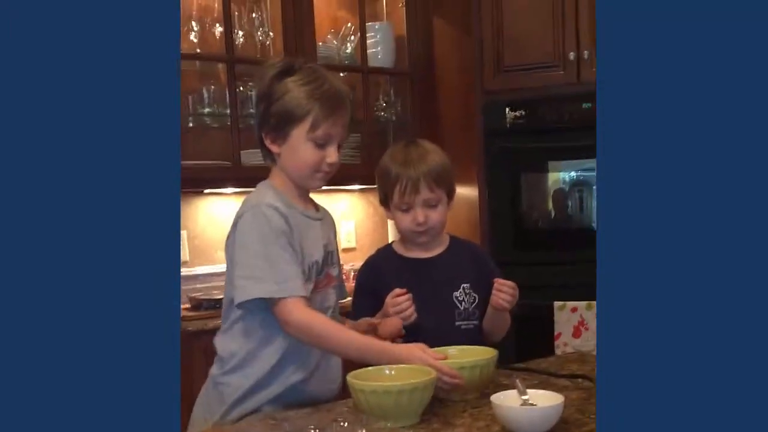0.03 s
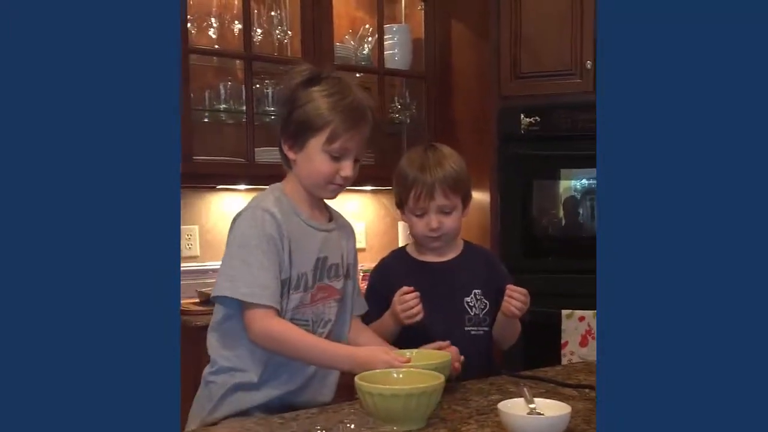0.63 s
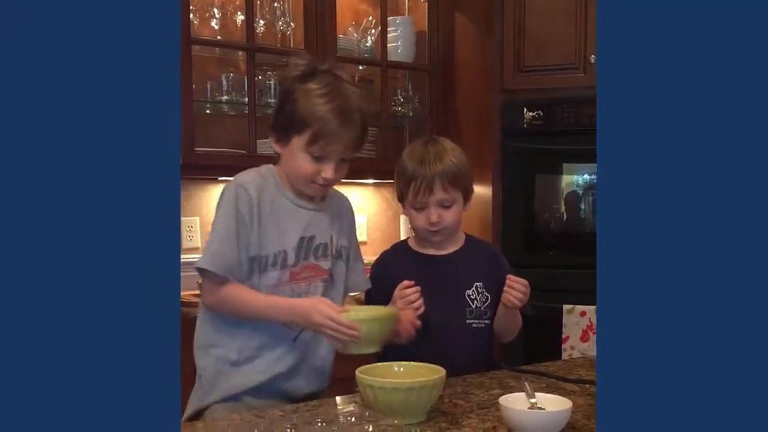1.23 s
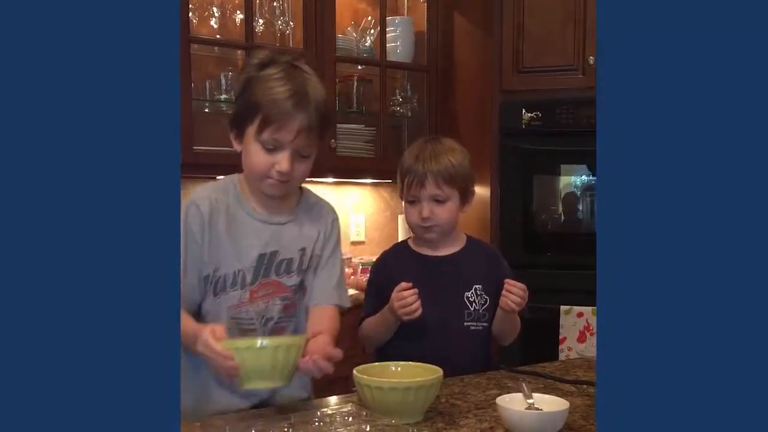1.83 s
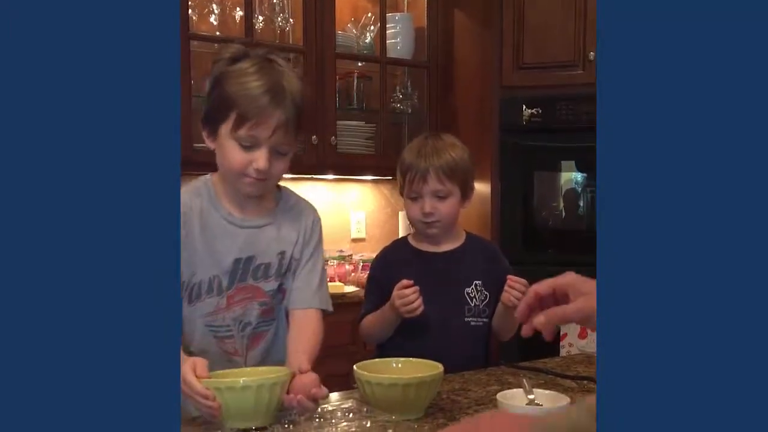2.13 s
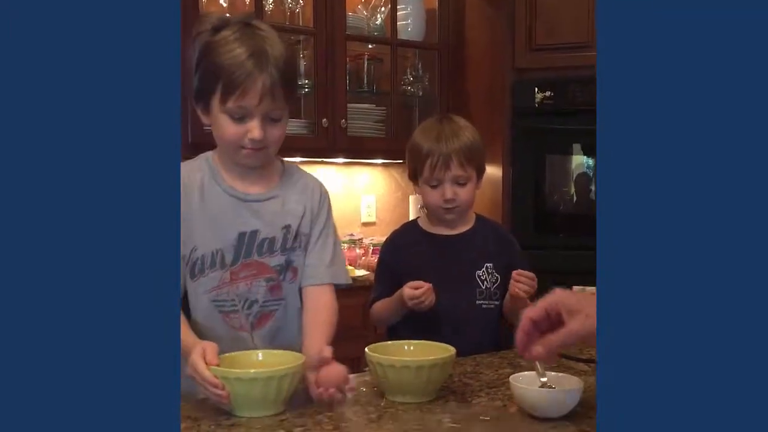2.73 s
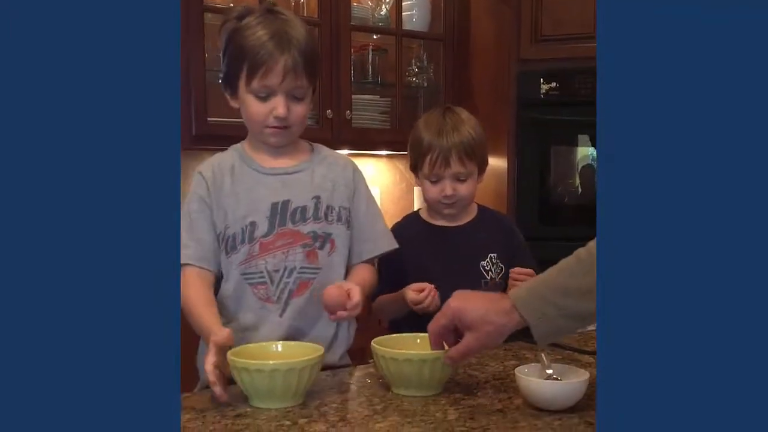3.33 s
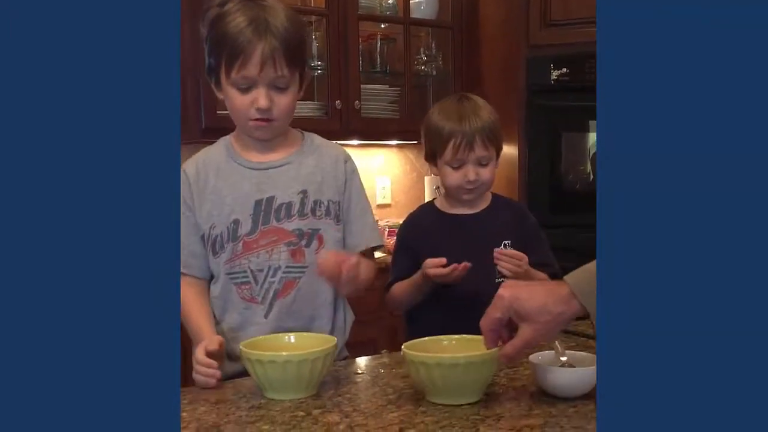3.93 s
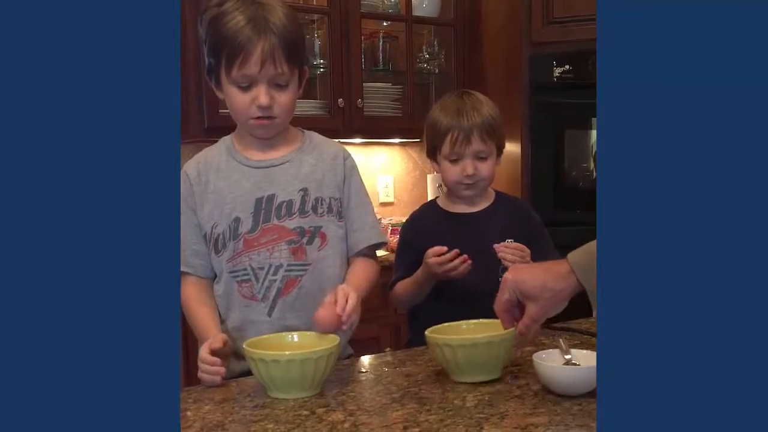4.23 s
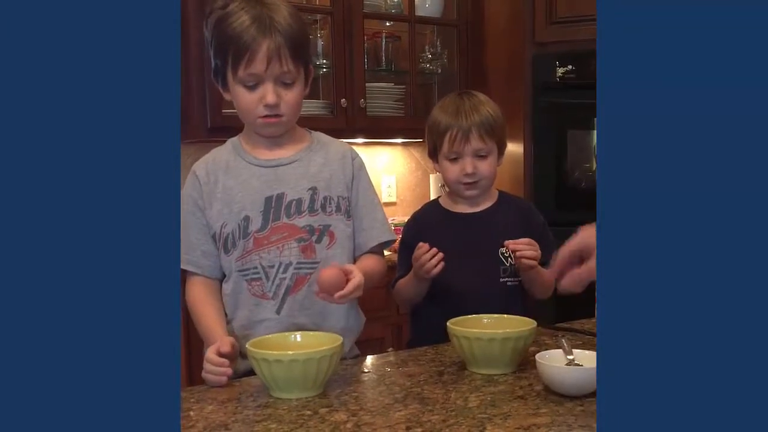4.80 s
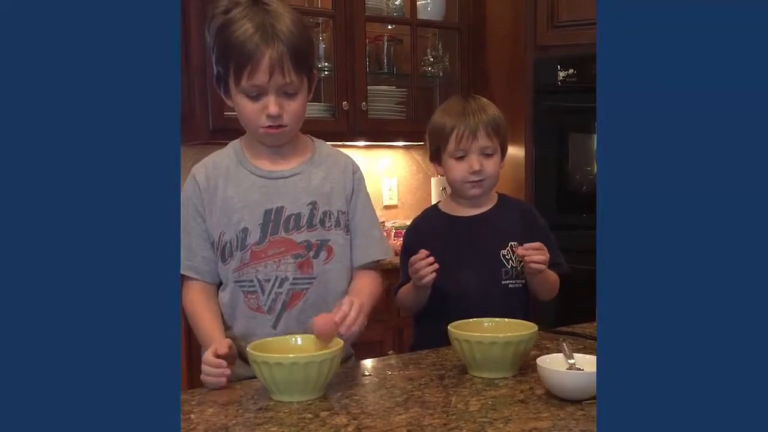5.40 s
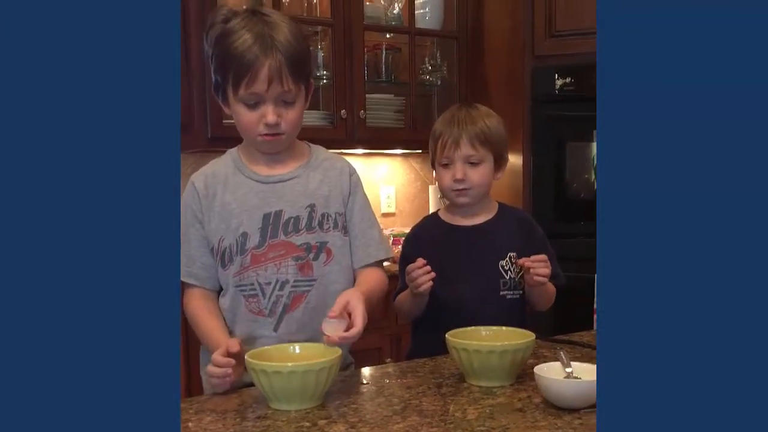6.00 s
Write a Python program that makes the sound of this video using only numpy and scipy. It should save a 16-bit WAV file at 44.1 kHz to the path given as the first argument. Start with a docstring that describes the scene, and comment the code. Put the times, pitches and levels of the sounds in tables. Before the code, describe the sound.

In a small kitchen, bowls are slid and set down with hard knocks before an eggshell is cracked on one, clinking and crackling.

```python
"""A small, hard kitchen, on one microphone by the stone counter, with a low steady hum behind.
Two ceramic bowls are slid, lifted past a shirt and set down: the foot sticks and slips, then clonks
on the stone and booms the cabinet below. Close to the microphone, the fibres of a sleeve rustle.
Then an egg is knocked on a rim: the bowl clinks, the shell caves in and crackles.
The room rings after every blow."""
import sys
import numpy as np
from scipy import signal
from scipy.fft import rfft, irfft
from scipy.io import wavfile
from scipy.ndimage import map_coordinates

SR = 44100
rng = np.random.default_rng(int(sys.argv[2]) if len(sys.argv) > 2 else 0)


def pcm_store(signal):
    """Save signal as 16-bit PCM."""
    levels = np.round(np.clip(np.atleast_2d(signal), -1, 1) * 32767)
    wavfile.write(sys.argv[1], SR, levels.astype(np.int16).T)


N = 271303
TIME = np.arange(N) / SR
RING_TIME = TIME[:SR // 2]

# room tone of the still kitchen: (frequency [Hz], relative level [dB])
HUM_SPECTRUM = [(15, -66), (25, -41), (45, -5), (108, -3), (137, -9.5), (206, -7), (285, -17.5),
                (384, -24.5), (439, -22), (840, -26.5), (988, -27.5), (1700, -28), (3080, -31),
                (14000, -41), (16000, -45)]
# the room's diffuse echo: (frequency [Hz], relative level [dB], t60 [s])
ROOM_TAIL = [(100, -6, 0.35), (255, 6, 0.54), (612, 3.5, 0.64), (1260, -5, 0.78), (2500, -1, 0.73),
             (4940, -4, 0.62), (10110, 2, 0.15), (16000, -10.5, .28)]
# reflections off nearby hard faces: (delay [s], gain [dB])
REFLECTIONS = [(.0072, -13.5), (0.0135, -6.5), (0.024, -12)]

# rubbing cloth: (frequency [Hz], gain [dB])
CLOTH_SPECTRUM = [(120, -41.5), (200, -13.5), (414, -17.5), (564, -12.5), (842, -7), (1170, -2.5),
                  (1450, -6.5), (1740, 1.5), (3180, -9.5), (4840, -16), (5590, -10), (7620, -19),
                  (9200, -14.5), (10200, -20), (11800, -18), (15500, -21)]
# the arm reaches in, holds the bowl, shifts it, draws back: (time [s], level [dB], treble boost [dB])
SLEEVE_MOVES = [(2.39, -79, 0), (2.409, -49.5, -11), (2.53, -56, 4.5), (2.66, -54, 10), (2.8, -59, 16.5),
                (2.98, -51.5, 8), (3.21, -53, -3), (3.32, -61.5, -4), (3.9, -64.5, -2), (4.08, -65, -2.5),
                (4.25, -54.5, 0.5), (4.55, -56, 1.5), (4.77, -48.5, -1), (4.92, -62.5, 7.5),
                (5.06, -79, -4.5)]
# sharp snags in the cloth: (time [s], level [dB], pitch [Hz], length [s], snap gain [dB])
CLOTH_SNAGS = [(2.4068, -34.5, 2560, 0.0053, -11), (2.449, -45, 4500, 0.008, -10),
               (2.5015, -33, 5560, 0.0036, -8), (2.612, -33, 5600, 0.0054, -10),
               (2.650, -31.5, 4500, 0.015, -6), (2.9395, -28, 2620, 0.019, 0),
               (3.0244, -31.5, 8000, 0.0018, -6), (3.1765, -41, 7000, 0.005, -15),
               (3.2179, -39, 5945, 0.0089, -14), (3.327, -48, 4213, 0.011, -18),
               (3.415, -48.5, 3001, .02, -28), (3.468, -49, 5300, .012, -16),
               (3.54, -52.5, 3300, .016, -25), (3.753, -49.5, 12000, .016, -20),
               (3.898, -49, 5400, .004, -21), (3.912, -49, 5002, .014, -19),
               (4.501, -33.5, 11000, .003, -6), (4.675, -45, 7000, .005, -6), (4.7925, -25, 2750, 0.011, 2),
               (4.845, -39, 7000, .008, -5)]
# the lifted bowl passes shirt and hand: (start [s], end [s], level [dB])
BRUSH_STROKES = [(1.444, 1.508, -50.5), (1.832, 1.87, -64)]
# its wall, damped by the grip: (frequency [Hz], width [Hz], gain [dB])
HELD_WALL_BANDS = [(1160, 170, 4.5), (2400, 550, 4.5), (2760, 400, -5.5)]

# a bowl is pushed over the stone: (start [s], end [s], relative level [dB], groan weight [dB])
PUSHES = [(0.0, 0.135, -64, -6), (0.224, 0.335, -52, -4.5), (0.436, 0.484, -58, -8.5),
          (0.535, 0.59, -56.5, -16), (0.634, 0.69, -60, -14), (0.738, 0.765, -62.5, -2.5),
          (3.375, 3.43, -53.5, -13.5), (3.517, 3.645, -39, -8), (3.67, 3.752, -42, -1.5),
          (3.77, 3.82, -48, 1), (3.84, 4.04, -64.5, -8), (4.087, 4.135, -46, -2), (4.36, 4.39, -43, -14.5),
          (4.558, 4.717, -55.5, -14)]
# the rasp of its foot: (frequency [Hz], width [Hz], gain [dB])
RASP_BANDS = [(970, 120, 19.5), (1330, 190, -8), (2000, 600, -12)]
# the scrape rises with the speed of the push and sinks as the bowl stops: (time [s], pitch [ratio])
PUSH_PITCH = [(0.1, 0.9), (0.3, 0.96), (0.56, 0.97), (0.63, 1.09), (0.68, 1.07), (0.73, .92), (0.78, 0.6),
              (3.37, 1.0), (3.56, 1.02), (3.85, 1.053), (4.38, 1.1)]
# the sliding foot catches and lets go: (time [s], level [dB], pitch [ratio], swell [s])
FOOT_CATCHES = [(0.179, -44.5, 0.81, .006), (0.277, -49, 0.89, .004), (0.306, -47, 0.9, .004),
                (0.436, -48, 1, .005), (0.530, -51, 1, .003), (0.612, -45.5, 1.05, .002),
                (0.651, -48, 0.97, .002), (0.672, -49, 1.03, .006), (0.708, -50, 0.85, .002),
                (0.720, -46.5, 0.87, .004), (3.435, -31.5, 1.14, .004), (3.454, -30.5, 0.93, .005),
                (3.603, -27, 1.02, .002), (3.640, -34, 1.06, .006), (3.682, -29.5, .97, .002),
                (3.705, -27, 0.99, .012), (3.759, -29.5, 0.98, .01), (3.807, -37, 1.1, .008),
                (4.008, -43.5, 0.94, .004)]

# a bowl's foot lands on the counter; the faint low bump at 5.324 s is the arm shifting just before the egg: #
# (time [s], level [dB], pitch [ratio], contact brightness [Hz], thump level [dB], thump pitch [Hz])
LANDINGS = [(0.865, -42.5, 0.98, 2100, -51, 169), (1.801, -53, 1.0, 1630, -46, 130),
            (2.176, -9.5, 1.003, 1900, -18.5, 180), (2.5875, -27.5, 0.92, 1700, -44, 178.2),
            (4.1341, -7.5, 1.168, 2563, -22, 132.6), (4.1385, -16.5, 1.02, 1502, -26.5, 133),
            (4.1516, -17.5, 1.01, 2110, -28.5, 134), (4.159, -17, 1.117, 1000, -28.5, 170),
            (4.4767, -23.5, 0.93, 1023, -45, 278.8), (4.482, -22, 1.09, 1900, -56, 202),
            (4.4937, -17.5, 1.006, 1413, -36.5, 257), (4.500, -21.5, 1.053, 1480, -50, 234),
            (4.507, -24.5, 0.87, 1400, -47, 200), (4.974, -62.5, 0.69, 1200, -49, 162.7),
            (5.324, -59, 0.62, 700, -49.5, 252.4), (5.3702, -18.5, 1.14, 2190, -23, 178),
            (5.3836, -16.5, 1.06, 2000, -36.5, 165), (5.398, -22, 0.854, 1870, -54, 169.6)]
# a bowl on stone, damped by hand and counter: (nominal frequency [Hz], relative level [dB], t60 [s])
FOOT_MODES = [(572, -12, 0.016), (851, -10.5, 0.033), (968, -2, 0.021), (1058.7, -1, 0.026),
              (1228, -7.5, 0.022), (1495, -12.5, 0.033), (1696, -11, 0.024), (2110, -4.5, .012),
              (2436, -10.5, 0.019), (2850, -13, 0.018), (5300, -41.5, 0.043), (6720, -29, .05)]
# crowded high overtones of the glazed wall: (frequency [Hz], width [Hz], gain [dB])
OVERTONE_BANDS = [(5150, 170, 1.5), (6750, 260, -2.5), (8930, 110, -1), (11620, 130, -9), (13520, 90, -2)]
# grit crushed under the glaze: (frequency [Hz], width [Hz], gain [dB])
GRIT_BANDS = [(4570, 410, -1.5), (5705, 1000, -4), (6650, 290, -2.5), (8800, 660, -8.5), (11700, 1200, -16),
              (13200, 680, -14)]
# the cabinet under the counter: (nominal frequency [Hz], relative level [dB], t60 [s])
CABINET_MODES = [(101, -3, 0.16), (134, -2, 0.081), (181.5, -4, 0.16), (203.4, -8, 0.13),
                 (257.4, -8.5, 0.14), (312.5, -11.5, .12), (351.2, -9.5, 0.24), (436, -6.5, 0.044),
                 (632, -8.5, 0.072)]
# the second bowl, bumped as the first is lifted: (nominal frequency [Hz], relative level [dB], t60 [s])
NEIGHBOUR_MODES = [(983, -0.5, 0.045), (1082, 1, 0.062), (2150, -15.5, 0.029), (2576, -7, 0.039),
                   (2690, -7, 0.035), (4600, -12.5, 0.035), (6750, -17.5, 0.03), (11500, -30, .02)]

# blows on the rim: (time [s], level [dB], pitch [ratio], contact brightness [Hz])
RIM_BLOWS = [(5.3692, -18.5, 1.04, 5030), (5.385, -13.5, 1.07, 6000), (5.431, -27, 0.97, 9000),
             (5.4411, -34, 1.0, 9000), (5.5319, -29, 0.98, 1200), (5.5503, -25.5, 0.98, 8000)]
# a bowl's free wall, bending in split pairs: (nominal frequency [Hz], relative level [dB], t60 [s])
WALL_MODES = [(1101, -0.5, 0.037), (1206, 2.5, 0.038), (2512, 2.5, 0.036), (2567, 2.5, 0.038),
              (4520, -7, 0.067), (4603, -3.5, 0.033), (6920, -10.5, 0.049), (8900, -20, 0.04),
              (12100, -23.5, .03)]
# the eggshell breaks: (time [s], level [dB], flake pitch [Hz], length [s], snap gain [dB])
SHELL_CRACKS = [(5.3695, -16.5, 1996, 0.01, -7.5), (5.386, -19, 1790, 0.012, -20.5),
                (5.4185, -25, 7000, 0.0025, 1), (5.4325, -26, 3740, 0.0025, -10.5),
                (5.4616, -20.5, 3700, 0.0045, -9), (5.4775, -22.5, 2370, 0.0028, -12),
                (5.498, -43, 2600, 0.003, -13), (5.5315, -37.5, 6460, 0.0066, -10),
                (5.5505, -34.5, 4500, 0.003, -11), (5.9985, -46.5, 2630, 0.0029, -35),
                (6.058, -59.5, 5860, 0.028, -35)]


def undb(db):
    """Decibels to gain."""
    return 10 ** (np.asarray(db) / 20)


def unit(x):
    """Scale to rms 1."""
    return x / np.sqrt(np.mean(x ** 2))


def peak(x, db):
    """Scale to a peak level."""
    return x * undb(db) / np.abs(x).max()


def add(out, time_s, x):
    """Mix a sound in at a time."""
    start = int(time_s * SR)
    out[start:start + len(x)] += x[:N - start]


def cut(x, hz, kind, order=2):
    """Low-pass or high-pass."""
    return signal.sosfilt(signal.butter(order, hz, kind, fs=SR, output="sos"), x)


def resonate(x, hz, width_hz):
    """One resonance, gain 1 at its centre."""
    return signal.lfilter(*signal.iirpeak(hz, hz / width_hz, fs=SR), x)


def body(x, bands):
    """Pass a sound through parallel resonances."""
    return sum(undb(db) * resonate(x, hz, width_hz) for hz, width_hz, db in bands)


def colour(x, spectrum):
    """Shape a steady sound with a spectrum; rms 1."""
    hz, db = np.transpose(spectrum)
    bins = np.maximum(np.fft.rfftfreq(N, 1 / SR), 1)
    gain = undb(np.interp(np.log(bins), np.log(hz), db))
    return unit(irfft(rfft(x) * gain, N))


def flicker(per_s):
    """A smooth random curve with a spread near 1."""
    return np.interp(TIME * per_s, np.arange(N // 20), rng.standard_normal(N // 20))


def grains(per_s, spread_db, size=N):
    """Random clicks of unequal strength."""
    clicks = (rng.random(size) < per_s / SR) * rng.choice([-1, 1], size)
    return clicks * undb(spread_db * rng.standard_normal(size))


def ring(modes, pitch):
    """Decaying modes; neighbours start in opposite directions, so the ring swells and beats."""
    return sum((-1) ** k * undb(db - 60 * RING_TIME / t60) * np.sin(2 * np.pi * hz * pitch * RING_TIME)
               for k, (hz, db, t60) in enumerate(modes))


def burst(length_s):
    """A dying cluster of tiny fractures, led by the first break."""
    fractures = unit(grains(9000, 1.3, size=len(RING_TIME))) * np.exp(-2 * RING_TIME / length_s)
    fractures[0] += 3
    return fractures


def stroke(start_s, end_s, db, arch_db, rise_db_per_s, fall_db_per_s):
    """Gain of one movement of the arm: it sets in, is fastest half way and dies out."""
    along = np.clip((TIME - start_s) / (end_s - start_s), 0, 1)
    early, late = np.maximum(start_s - TIME, 0), np.maximum(TIME - end_s, 0)
    return undb(db - arch_db * (2 * along - 1) ** 2 - rise_db_per_s * early - fall_db_per_s * late)


def hum(db=-65, waver_db=1):
    """Room tone behind everything: low steady noise with a thin hiss."""
    gain = undb(db + waver_db * flicker(6.8))
    return gain * cut(colour(rng.standard_normal(N), HUM_SPECTRUM), 35, "high")


def kitchen_echo(early_db=2, early_s=0.029, gap_s=0.002):
    """The room's response at the microphone: counter and cupboards answer first, then a diffuse tail."""
    hz, db, t60 = np.transpose(ROOM_TAIL)
    bins, times, cells = signal.stft(rng.standard_normal(SR), SR, nperseg=256)
    db, t60 = (np.interp(np.log(bins + 1), np.log(hz), column)[:, None] for column in (db, t60))
    tail = signal.istft(cells * undb(db - 60 * times / t60), SR)[1][:SR]
    early_lift = 1 + undb(early_db) * np.exp(-TIME[:SR] / early_s)
    onset = np.clip(TIME[:SR] / gap_s - 1, 0, 1)
    reflections = np.zeros(SR)
    for delay_s, gain_db in REFLECTIONS:
        reflections[int(delay_s * SR)] = undb(gain_db)
    return tail * early_lift * onset / np.sqrt(SR / 20) + cut(reflections, 3500, "low", order=1)


def reaching():
    """True for as long as the arm is stretched out."""
    return (TIME > SLEEVE_MOVES[0][0]) * (TIME < SLEEVE_MOVES[-1][0])


def threads(per_s=60, db=-60.5, length_s=0.012, follow=0.75):
    """Single threads scratch; they fade less than the rustle, so stand out when the arm is nearly still."""
    pulse = RING_TIME * np.exp(-4 * RING_TIME / length_s)
    rub = signal.fftconvolve(np.abs(grains(per_s, spread_db=2)), pulse)[:N]
    scratches = colour(rub * grains(8000, spread_db=2), CLOTH_SPECTRUM)
    scratches = unit(cut(scratches, 3500, "high", order=1))
    times, level_db, _ = np.transpose(SLEEVE_MOVES)
    drop_db = np.interp(TIME, times, level_db.max() - level_db)
    return undb(db - follow * drop_db) * scratches * reaching()


def sleeve(flutter_db=2.26, swell_db=1.0, fold_db=2.5):
    """Close to the microphone, cloth fibres catch and release thousands of times a second."""
    fibres = grains(6500, spread_db=5.5) * undb(flutter_db * flicker(70) + swell_db * flicker(16))
    # shifting folds shade each band of the rustle in turn
    folds = sum(resonate(fibres, hz, hz / 4) * undb(fold_db * flicker(22))
                for hz in np.geomspace(400, 14000, 14))
    rustle = colour(folds, CLOTH_SPECTRUM)
    treble = cut(rustle, 6000, "high", order=1)
    times, level_db, treble_db = np.transpose(SLEEVE_MOVES)
    rustle += (undb(np.interp(TIME, times, treble_db)) - 1) * treble
    return rustle * undb(np.interp(TIME, times, level_db)) * reaching()


def brushes(judder_db=4.5):
    """The carried bowl brushes against shirt and hand: fine friction sounds its damped wall."""
    friction = grains(6000, spread_db=3) * undb(judder_db * flicker(80))
    wall = body(friction, HELD_WALL_BANDS)
    swish = unit(cut(cut(wall, 3050, "low", order=4), 600, "high"))
    return swish * sum(stroke(start, end, db, arch_db=7.5, rise_db_per_s=268, fall_db_per_s=168)
                       for start, end, db in BRUSH_STROKES)


def slides(trim_db=-3, groan_trim_db=-1, judder_db=3.5, wobble=0.02):
    """The unglazed foot sticks and slips on stone, higher as it speeds up; pressed harder, it groans."""
    slips = grains(3000, spread_db=1.8) * undb(judder_db * flicker(55))
    rasp = body(slips, RASP_BANDS)
    rasp = unit(cut(cut(rasp, 1800, "low", order=3), 650, "high"))
    groan = resonate(slips, hz=590, width_hz=220)
    groan = unit(cut(cut(groan, 630, "low"), 229.6, "high"))
    # reading both sounds faster or slower bends their pitch
    pitch = np.interp(TIME, *np.transpose(PUSH_PITCH)) * (1 + wobble * flicker(30))
    rasp, groan = (map_coordinates(x, [np.cumsum(pitch)], mode="mirror") for x in (rasp, groan))
    out = np.zeros(N)
    for start, end, db, weight_db in PUSHES:
        gain = stroke(start, end, db + trim_db, arch_db=5, rise_db_per_s=191.5, fall_db_per_s=220)
        out += gain * (rasp + undb(weight_db + groan_trim_db) * groan)
    return out


def cabinet(thump_hz, favour_db=9.5, width_octaves=0.41):
    """The panels under the counter ring; each spot favours the modes near its thump pitch."""
    modes = [(hz, db + favour_db * np.exp(-(np.log2(hz / thump_hz) / width_octaves) ** 2), t60)
             for hz, db, t60 in CABINET_MODES]
    return ring(modes, pitch=0.97)


def catches(thump_gain_db=-25.5):
    """A sliding foot grips and chatters: its ring builds up over several cycles, without a click."""
    out = np.zeros(N)
    for time_s, db, pitch, swell_s in FOOT_CATCHES:
        swell = (1 - np.exp(-RING_TIME / swell_s)) ** 2
        chatter = cut(ring(FOOT_MODES, pitch) * swell, 1250, "low", order=3)
        add(out, time_s, peak(chatter, db) + peak(cabinet(thump_hz=200), db + thump_gain_db))
    return out


def knocks(overtone_gain_db=-39, overtone_t60_s=0.12, grit_gain_db=-31.5, grit_db_per_octave=53):
    """The foot strikes stone: a short clonk, a tick of grit against the glaze, then the cabinet booms."""
    bowl, boom = np.zeros(N), np.zeros(N)
    for time_s, db, pitch, bright_hz, thump_db, thump_hz in LANDINGS:
        clonk = cut(ring(FOOT_MODES, pitch), bright_hz, "low", order=3)
        overtones = body(rng.standard_normal(len(RING_TIME)), OVERTONE_BANDS)
        overtones *= undb(-60 * RING_TIME / overtone_t60_s)
        grit = body(burst(length_s=0.005), GRIT_BANDS)
        # a harder, brighter contact crushes more grit
        grit_db = db + grit_gain_db + grit_db_per_octave * np.log2(bright_hz / 1943)
        add(bowl, time_s, peak(clonk, db) + peak(overtones, db + overtone_gain_db))
        add(bowl, time_s + 0.0013, peak(grit, grit_db))
        add(boom, time_s + 0.002, peak(cabinet(thump_hz), thump_db))
    # the boom carries almost no deep bass
    return bowl, cut(boom, 62, "high", order=3)


def clinks(bump_s=0.865, bump_db=-35.5):
    """A blow on the rim rings the wall, each with its own brightness. The second bowl rings once, when bumped."""
    out = np.zeros(N)
    for time_s, db, pitch, bright_hz in RIM_BLOWS:
        # a hand on the rim loads only the slow bending pair
        wall = ring(WALL_MODES[:2], pitch) + ring(WALL_MODES[2:], pitch=1)
        add(out, time_s, peak(cut(wall, bright_hz, "low", order=1), db))
    add(out, bump_s, peak(ring(NEIGHBOUR_MODES, pitch=0.99), bump_db))
    return out


def crumble(start_s=5.372, fade_s=0.062, db=-35.5):
    """Fine splinters of shell keep breaking while the egg sinks onto the rim."""
    age = TIME - start_s
    splinters = grains(1800, spread_db=4.5)
    splinters = cut(cut(splinters, 1000, "high", order=1), 7000, "low", order=1)
    return undb(db) * unit(splinters) * (age > 0) * np.exp(-np.abs(age) / fade_s)


def crackle(breaks, width_ratio, snap_hz):
    """Shell cracks or cloth snags: each burst rings a broad resonance and adds a bright snap."""
    out = np.zeros(N)
    for time_s, db, hz, length_s, snap_db in breaks:
        fractures = burst(length_s)
        snap = undb(snap_db) * cut(fractures, snap_hz, "high", order=1) / 2
        width_hz = hz * width_ratio
        tick = resonate(resonate(fractures, hz, width_hz), hz, width_hz)
        add(out, time_s, peak(tick + snap, db))
    return out


def scene():
    """Bowls, egg and cloth reach the microphone directly and through the kitchen, over the room tone."""
    foot, boom = knocks()
    rim = clinks()
    shell = crackle(SHELL_CRACKS, width_ratio=0.54, snap_hz=2500) + crumble()
    cloth = sleeve() + threads() + crackle(CLOTH_SNAGS, width_ratio=1.8, snap_hz=2980)
    scrape = slides() + catches() + brushes()
    # the sleeve is nearest the microphone, so it is the driest
    into_room = (undb(-5) * foot + undb(-6.5) * rim + undb(-8.5) * boom
                 + undb(-3.5) * shell + undb(-6) * scrape + undb(-9.5) * cloth)
    echo = signal.fftconvolve(into_room, kitchen_echo())[:N]
    return (foot + rim + boom + shell + cloth + scrape + echo + hum())[None]


def record(dry):
    """The recorder cuts the top steeply above 15.8 kHz."""
    return signal.sosfilt(signal.ellip(10, 0.2, 70, 15800, fs=SR, output="sos"), dry)


dry = scene()
out = record(dry)
pcm_store(out)
```